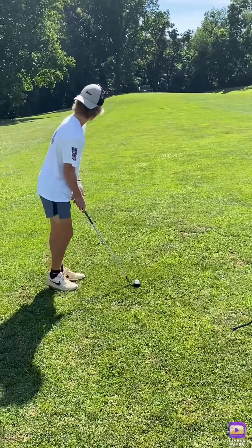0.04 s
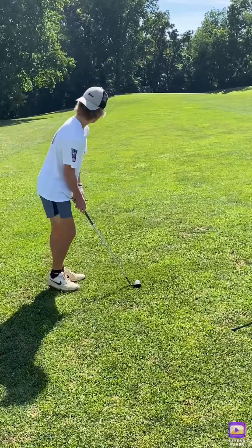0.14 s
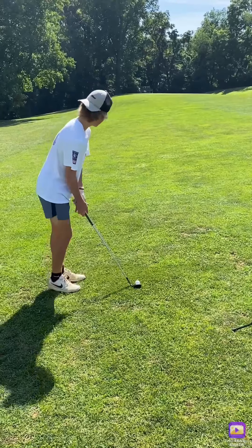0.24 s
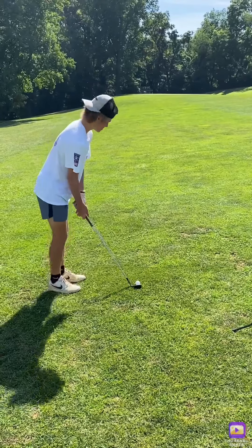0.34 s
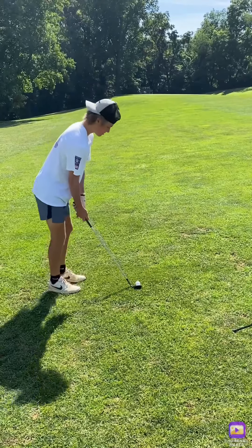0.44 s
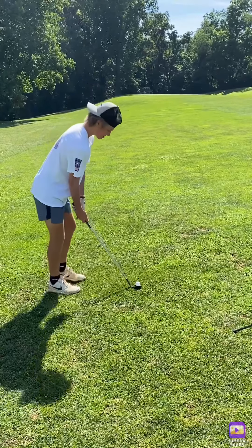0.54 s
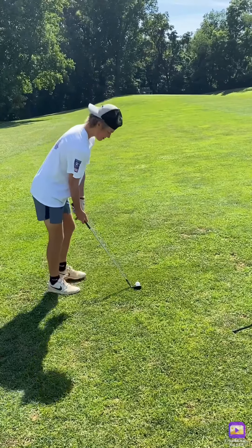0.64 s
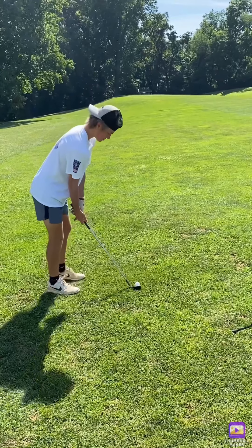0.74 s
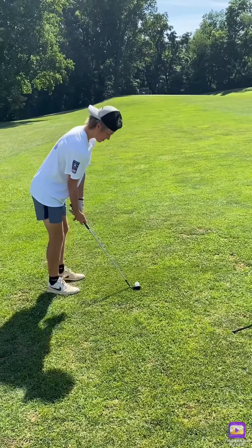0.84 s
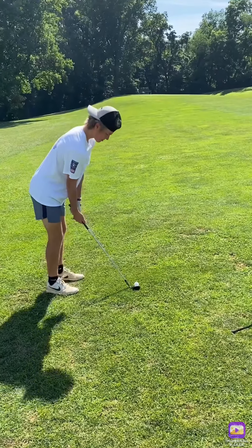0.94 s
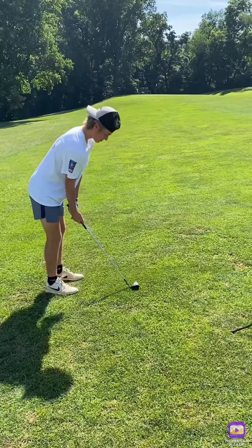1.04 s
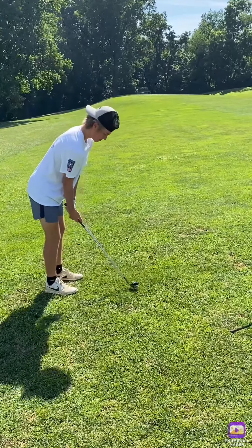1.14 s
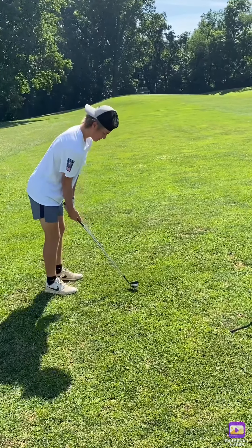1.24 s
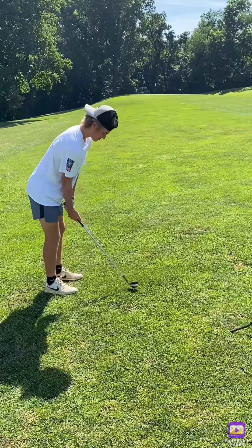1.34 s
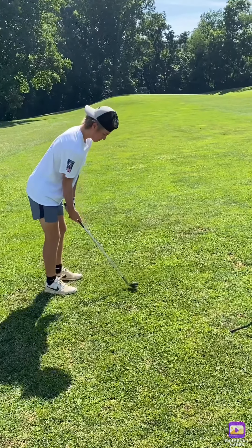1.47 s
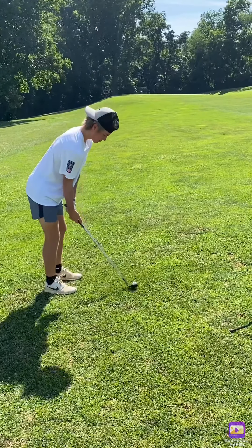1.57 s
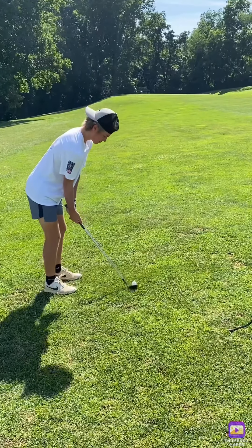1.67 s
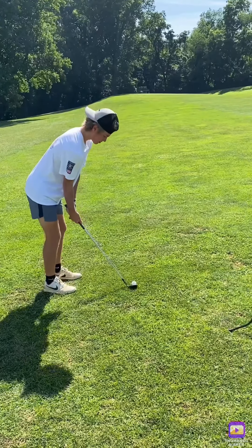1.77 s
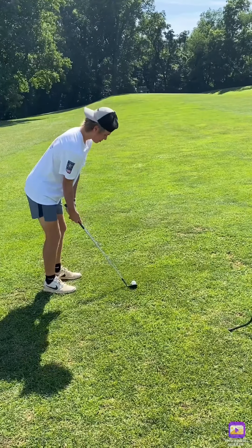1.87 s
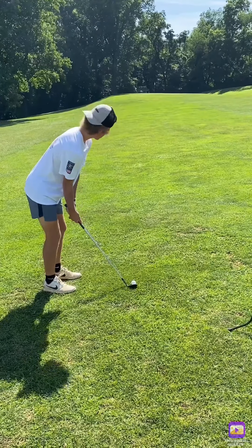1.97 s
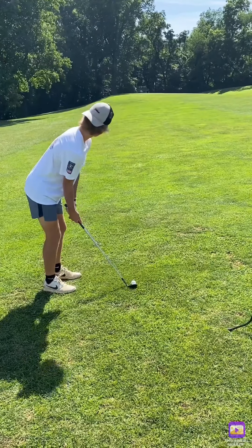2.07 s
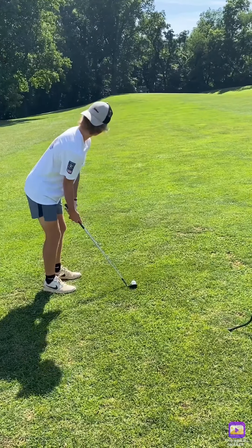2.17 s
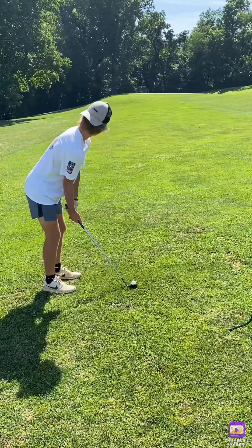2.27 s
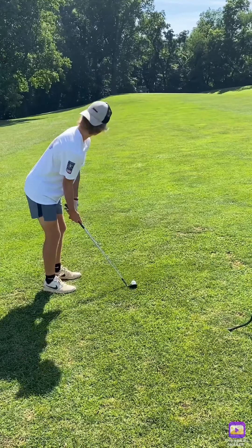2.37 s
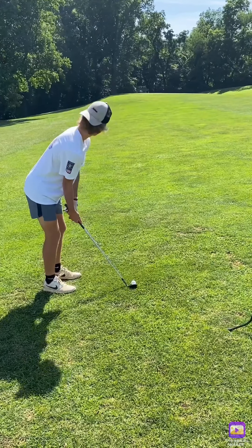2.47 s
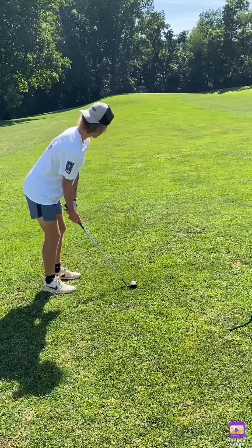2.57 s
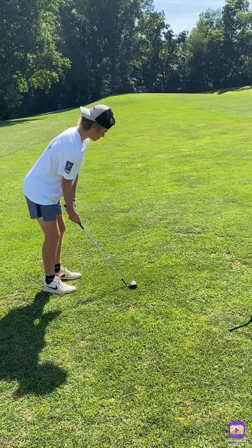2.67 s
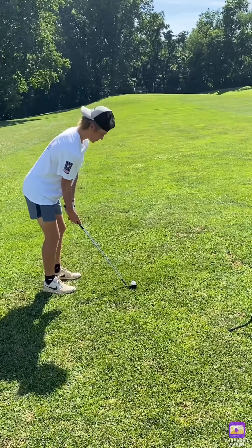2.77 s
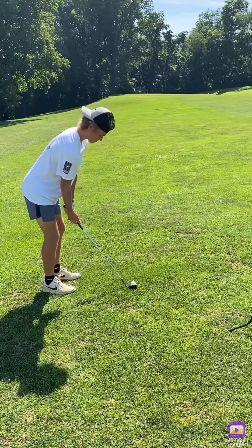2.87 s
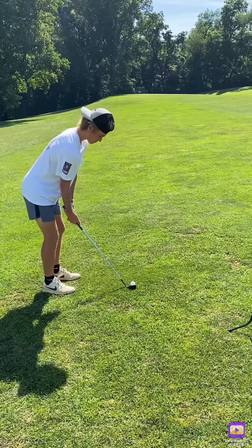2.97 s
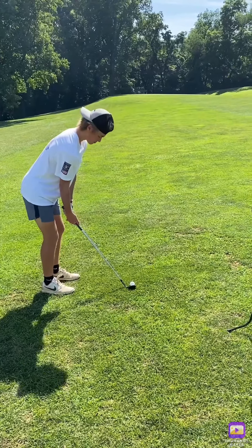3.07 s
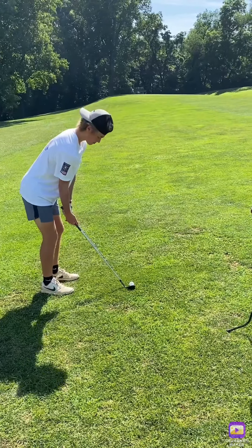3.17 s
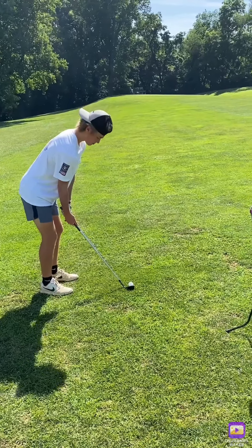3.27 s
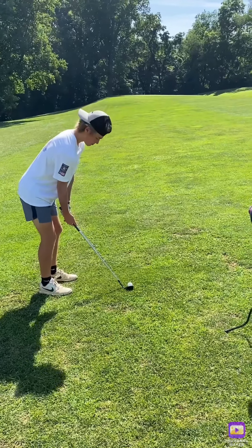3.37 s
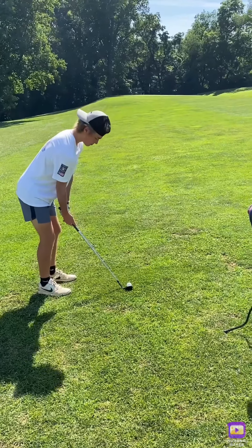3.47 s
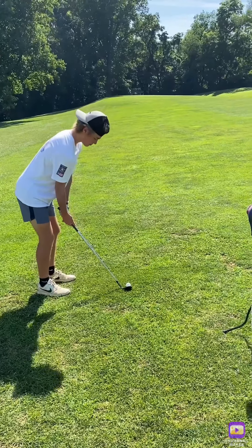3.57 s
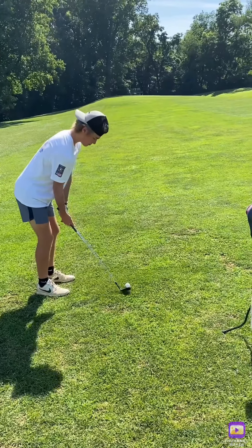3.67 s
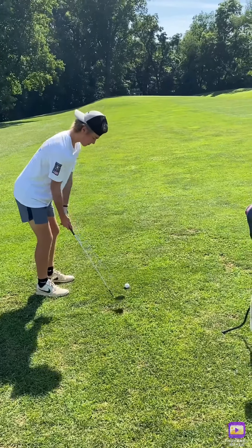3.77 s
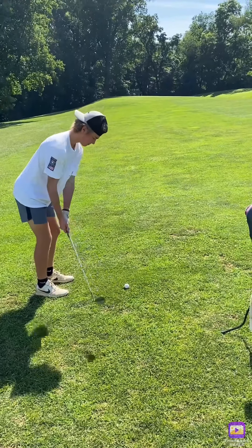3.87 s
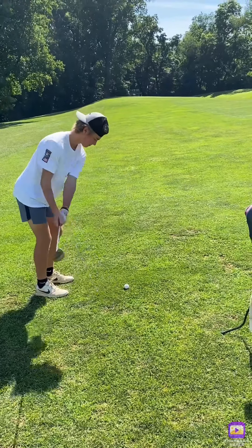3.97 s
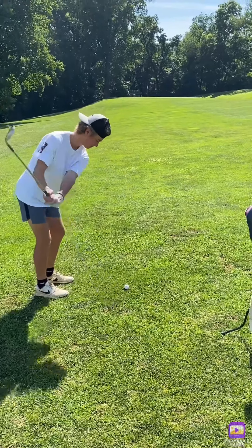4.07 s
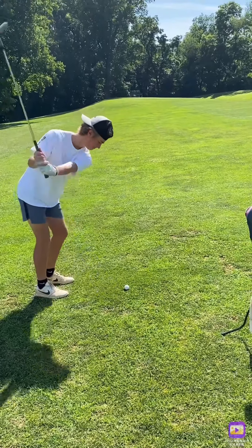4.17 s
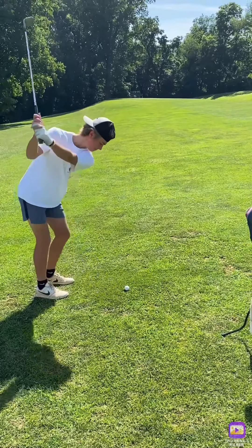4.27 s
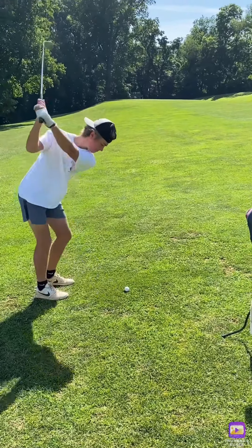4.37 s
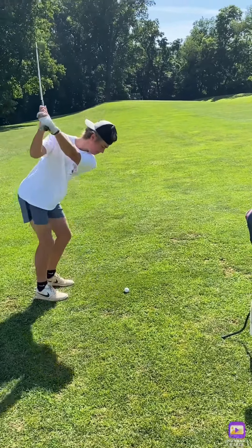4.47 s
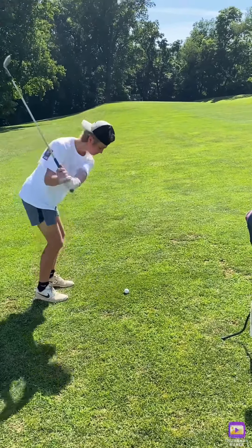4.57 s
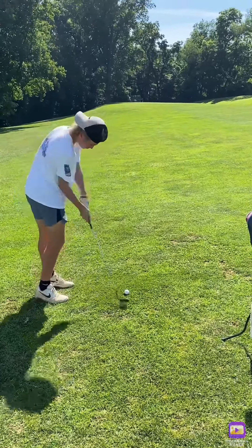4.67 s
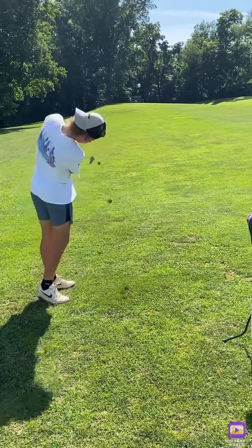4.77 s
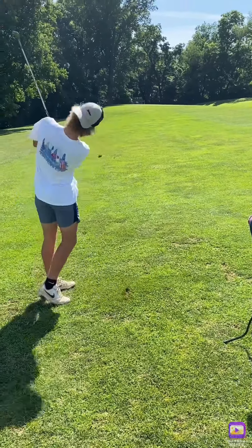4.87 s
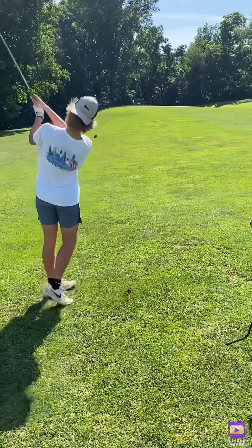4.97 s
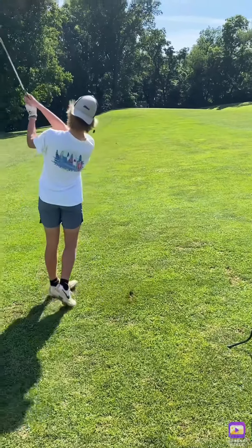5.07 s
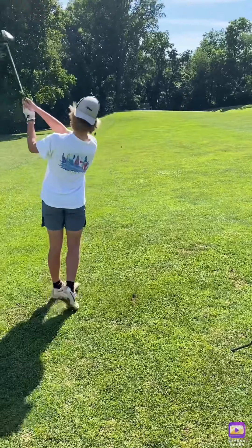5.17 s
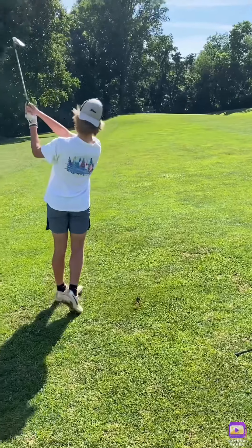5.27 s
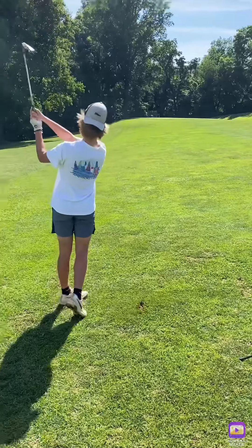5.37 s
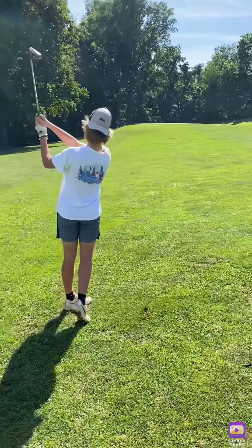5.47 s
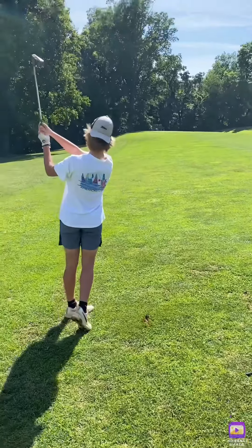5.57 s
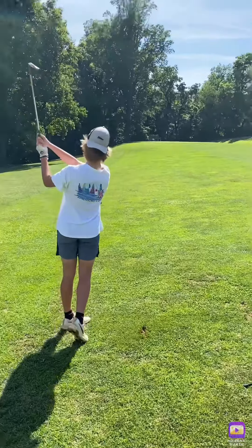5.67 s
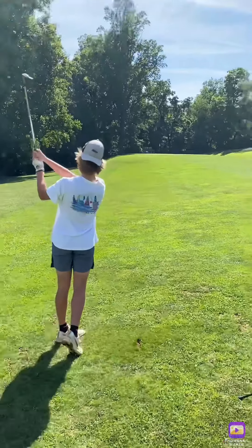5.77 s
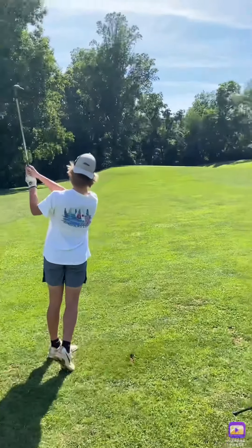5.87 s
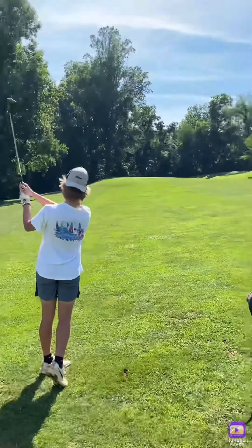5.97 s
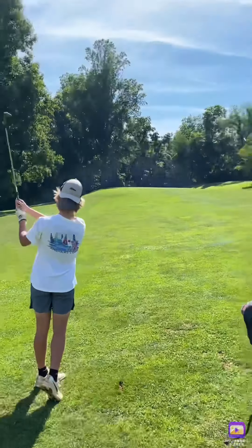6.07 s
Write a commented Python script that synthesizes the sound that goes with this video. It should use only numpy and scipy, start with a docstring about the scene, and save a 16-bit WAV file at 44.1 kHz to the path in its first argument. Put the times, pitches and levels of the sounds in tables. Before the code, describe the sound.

A soft outdoor bed lasts all six seconds: broad distant tyre rush, deep rumble, and two far mowers beating slightly right of centre, slowly fading. From 0 to 1.2 s, five faint dry knocks sound about a quarter second apart, with light grass rustling and a tiny stalk snap at 0.8. Thin high chirps come at 0.4, 0.9 and 2.2-2.35 s, echoing in trees among faint scattered whistles. A low exhaust note swells around 1.8, 2.25 and 3.9 s; a far machine's boom and whine ease after 3.2. Cloth rustles gently at 4.3, then a rapid swish rises to a single loud, dry, bright click at 4.71, with turf tearing and a short soil thud, gone within a tenth of a second. Follow-through rustle fades by 5.1. Three soft chirps follow at 5.25-5.4, leaves stir near 5.6, and a crisp grass scuff comes at 5.77.

```python
"""Golf iron shot on a fairway

An iron swishes down, strikes the ball with one sharp click (damped modes) and cuts a divot (noise bursts).
Behind it: traffic rush and breeze (shaped noise), two mowers and far machines (harmonics, wavering tones).
Clothes and grass rustle (flickering noise), birds chirp (gliding sines with echo), faint knocks sound far off.
Faint short whistling tones are scattered at random. Two close microphone ports pick it all up.
"""
import sys
import numpy as np
from scipy import signal
from scipy.fft import rfft, irfft, next_fast_len
from scipy.io import wavfile
from scipy.ndimage import map_coordinates

SR = 44100
rng = np.random.default_rng(int(sys.argv[2]) if len(sys.argv) > 2 else 0)


def master_out(mix):
    """Clip the mix to full scale and print it as 16-bit PCM to the path in sys.argv[1]."""
    frames = np.transpose(np.atleast_2d(mix))
    ceiling = np.clip(frames, -1, 1)
    pcm = np.round(ceiling * 32767).astype(np.int16)
    wavfile.write(sys.argv[1], SR, pcm)


N = 270485
T = np.arange(N) / SR


def amp(db):
    """Decibels to gain."""
    return 10 ** (np.asarray(db) / 20)


def unit(x):
    """Scale to rms 1."""
    return x / np.sqrt(np.mean(x ** 2) + 1e-20)


def wobble(rate_hz):
    """Smooth random curve, rate_hz knots a second."""
    knots = rng.standard_normal(int(N * rate_hz / SR) + 4)
    return map_coordinates(knots, [T * rate_hz])


def filtered(x, response):
    """Multiply the spectrum of x by a complex response of frequency."""
    size = next_fast_len(N + SR // 2)
    hz = np.fft.rfftfreq(size, 1 / SR)
    return irfft(rfft(x, size) * response(hz), size)[..., :N]


def coloured(x, spectrum):
    """Shape x by (frequency [Hz], gain [dB]) points on a log axis."""
    points_hz, points_db = np.transpose(spectrum)
    return filtered(x, lambda hz: amp(np.interp(np.log(hz + 1), np.log(points_hz), points_db)))


def noise(spectrum):
    """Coloured noise of rms 1; only the shape of the spectrum counts."""
    return unit(coloured(rng.standard_normal(N), spectrum))


def burst(peak_s, rise_s, t60_s):
    """Envelope climbing 60 dB in rise_s to its peak, then falling 60 dB in t60_s."""
    return amp(-60 * np.maximum((peak_s - T) / rise_s, (T - peak_s) / t60_s))


def ring(modes, start_s):
    """Exponentially damped modes set going together; neighbours start in opposite directions."""
    t = np.maximum(T - start_s, 0)
    total = np.zeros(N)
    for k, (hz, db, t60_s) in enumerate(modes):
        total += (-1) ** k * amp(db - 60 * t / t60_s) * np.sin(2 * np.pi * hz * t)
    return total


def swell(peak_s, width_s):
    """Gain rising to 1 at its peak and sinking again, 3 dB down width_s to either side."""
    return 1 / np.hypot(1, (T - peak_s) / width_s)


# tyre rush, rumble, tyre song: (frequency [Hz], relative density [dB/Hz])
TYRE_SPECTRUM = [(150, -0.5), (340, -9), (460, -3), (620, -4.5), (850, 0), (1300, -7), (1800, -10.5),
                 (2400, -14.5), (3500, -25), (4500, -33), (6600, -40), (8500, -69), (12500, -75),
                 (14500, -70.5)]
RUMBLE_SPECTRUM = [(22, -38.5), (32, -20), (43, -3), (70, 8.5), (110, -0.5), (160, -0.5), (220, -13.5),
                   (320, -19), (600, -82.5)]
TYRE_SONG_SPECTRUM = [(550, -26), (780, 4), (900, 9.5), (1050, -0.5), (1500, -12), (2500, -47.5)]
# tyre rush scattered by trees, relative to direct: (frequency [Hz], gain [dB])
TREE_SCATTER = [(300, -16.5), (500, -11.5), (1900, -14.5), (2400, -5), (6500, -15)]
# swells of the tyre song, one long and one brief: (peak time [s], level [dB], time to fall 3 dB [s])
TYRE_SONG_SWELLS = [(0.59, -50.5, 1.4), (3.0, -53.5, 0.3)]
TRAFFIC_START_DB, TRAFFIC_FADE_DB_PER_S = -44, .145


def traffic():
    """Far tyres rush, flutter and rumble, their song swells twice; a scattered part is opposite left and right."""
    level = amp(TRAFFIC_START_DB - TRAFFIC_FADE_DB_PER_S * T + .43 * wobble(3.5) + .59 * wobble(120))
    centre = level * noise(TYRE_SPECTRUM) + amp(-43.0) * noise(RUMBLE_SPECTRUM)
    song_power = sum((amp(db) * swell(s, width_s)) ** 2 for s, db, width_s in TYRE_SONG_SWELLS)
    flutter = amp(.8 * wobble(7) + 1.5 * wobble(120))
    centre += np.sqrt(song_power) * flutter * noise(TYRE_SONG_SPECTRUM)
    spread = level * coloured(noise(TYRE_SPECTRUM), TREE_SCATTER)
    spread += amp(-58.5) * noise(RUMBLE_SPECTRUM)
    return np.array([centre + spread, centre - spread])


def mower(cycle_hz, orders, drift, flutter_db):
    """Harmonics of one engine cycle; the speed hunts a little and the air makes each line flutter."""
    turns = np.cumsum(cycle_hz * (1 + drift * wobble(1.498))) / SR
    lines = np.zeros(N)
    for order, db in orders:
        phase_turns = round(order) * turns + rng.random()
        lines += amp(db + flutter_db * wobble(2.8)) * np.sin(2 * np.pi * phase_turns)
    return np.sqrt(2) * lines


def drone(hz, waver_db):
    """Far exhaust note wavering in level and phase."""
    return amp(waver_db * wobble(12)) * np.sin(2 * np.pi * (hz * T + .45 * wobble(7)))


# engine cycle rates: (mower A [Hz], mower B [Hz])
MOWER_CYCLE_HZ = (20.21, 21.27)
# mower harmonics: (multiple of cycle rate [1], relative level [dB])
MOWER_A_ORDERS = [(5, -45.5), (6, -62), (7, -46), (9, -46.5), (10, -52), (11, -54), (12, -54.5),
                  (14, -57.5), (16, -64), (19, -69.5), (21, -71), (23, -72.5)]
MOWER_B_ORDERS = [(2, -57), (5, -48.5), (6, -50.5), (7, -43), (8, -62), (9, -49), (10, -73), (12, -62),
                  (13, -62.5), (14, -63)]
MOWER_START_DB, MOWER_FADE_DB_PER_S = 1.03, .62  # added to the harmonics
# far machine's whine: (frequency [Hz], relative density [dB/Hz])
WHINE_SPECTRUM = [(300, 4), (385, 9), (430, 15.5), (480, 13.5), (560, 2.5), (750, -41.5)]
LOAD_MID_S, LOAD_RAMP_S = 3.2, .63
BOOM_HZ, BOOM_LOADED_DB, BOOM_GROWS_DB = 53.7, -39, 8
WHINE_LOADED_DB, WHINE_GROWS_DB = -55, 14.5
# far exhaust swelling and sinking: (time [s], level [dB])
EXHAUST_LEVEL = [(0, -40), (1.6, -41.5), (1.8, -29.5), (2.04, -42.5), (2.24, -29.5), (2.45, -42.5),
                 (2.9, -36), (3.6, -42.5), (3.86, -34), (4.1, -43.5), (5.3, -40), (6.1, -47.5)]
EXHAUST_HZ = 81.5


def engines():
    """Two receding mowers beat; a far machine booms and whines more as it takes up load; an exhaust drones."""
    mowers = mower(MOWER_CYCLE_HZ[0], MOWER_A_ORDERS, drift=.0015, flutter_db=1.0)
    mowers += mower(MOWER_CYCLE_HZ[1], MOWER_B_ORDERS, drift=.003, flutter_db=1.5)
    mowers *= amp(MOWER_START_DB - MOWER_FADE_DB_PER_S * T)
    slack = np.clip(.5 - (T - LOAD_MID_S) / LOAD_RAMP_S, 0, 1)  # 1 = unloaded
    boom = amp(BOOM_LOADED_DB - BOOM_GROWS_DB * slack) * drone(BOOM_HZ, waver_db=3.0)
    whine = amp(WHINE_LOADED_DB - WHINE_GROWS_DB * slack) * noise(WHINE_SPECTRUM)
    exhaust_gain = amp(np.interp(T, *np.transpose(EXHAUST_LEVEL)))
    return mowers + boom + whine + exhaust_gain * drone(EXHAUST_HZ, waver_db=2.0)


# leaves in a breeze: (frequency [Hz], relative density [dB/Hz])
LEAF_SPECTRUM = [(1500, -9.5), (3300, 4), (5500, -3.5), (6800, -12), (8500, -30)]
BREEZE_PEAK_S, BREEZE_DB, BREEZE_WIDTH_S = 5.6, -70, .49


def leaves():
    """A light breeze swells in the trees: wavering noise."""
    level = amp(BREEZE_DB + 1.5 * wobble(12))
    return level * swell(BREEZE_PEAK_S, BREEZE_WIDTH_S) * noise(LEAF_SPECTRUM)


# faint far knocks: (time [s], frequency [Hz], level [dB])
KNOCKS = [(0.089, 810, -32), (0.337, 1080, -32), (0.683, 950, -32), (0.93, 820, -32), (1.178, 860, -32.5)]


def knocks():
    """Faint, dry far knocks: sines a few cycles long."""
    total = np.zeros(N)
    for s, hz, db in KNOCKS:
        total += amp(db) * burst(s, rise_s=.005, t60_s=.018) * np.sin(2 * np.pi * hz * (T - s))
    return total


# chirps, and one faint steady echo note after the 2.33 s chirp:
# (time [s], length [s], starting pitch [Hz], fall as share of pitch [1], level [dB])
BIRD_NOTES = [(0.42, .02, 4570, .05, -65), (0.902, .04, 5500, .14, -65.5), (2.19, .032, 5570, .2, -69),
              (2.33, .032, 5090, .13, -63), (2.355, .05, 5050, 0, -72), (5.25, .06, 2600, -.04, -59),
              (5.315, .06, 2730, -.02, -58), (5.385, .08, 2890, -.12, -63)]
FLICKER_COUNT, FLICKER_MAX_DB = 26, -65
WOOD_DB, WOOD_T60_S = -4.5, .7


def whistles():
    """Bird chirps hold their pitch, then glide; faint short tones are scattered at random; the wood echoes."""
    flickers = []
    for a, b, c, d in rng.random((FLICKER_COUNT, 4)):
        # higher tones are fainter
        flickers.append((6.1 * a, .02 + .04 * b, 2600 + 2400 * c, .3 * d - .1, FLICKER_MAX_DB - 12 * c))
    notes = np.zeros(N + SR)
    for s, length_s, hz, fall, db in BIRD_NOTES + flickers:
        u = np.linspace(0, 1, int(length_s * SR))
        turns = np.cumsum(hz * (1 - fall * u ** 3)) / SR
        envelope = np.sin(np.pi * u ** 1.3) ** 2
        notes[int(s * SR):][:len(u)] += amp(db) * envelope * np.sin(2 * np.pi * turns)
    tail = rng.standard_normal(SR) * amp(-60 * T[:SR] / WOOD_T60_S)
    echo = signal.fftconvolve(notes, tail / np.linalg.norm(tail))[:N]
    return notes[:N] + amp(WOOD_DB) * echo


# crushed grass, dry stalk: (frequency [Hz], relative density [dB/Hz])
GRASS_SPECTRUM = [(1000, -7.5), (3000, 5.5), (5500, 7), (7000, -2), (8500, -6), (10700, -3), (12500, -8),
                  (15500, -8)]
STALK_SPECTRUM = [(1000, -9), (5000, 5), (11000, -4), (15500, -7)]
# shoes shifting, and a brief loud crackly rustle at 5.76 s: (time [s], length [s], level [dB])
SCUFFS = [(0.04, 0.11, -75), (0.198, .06, -71), (0.42, .2, -78), (5.395, .03, -75), (5.54, .03, -74),
          (5.763, 0.03, -55.5), (5.787, .035, -58.5)]
SCUFF_EASE = 5.7  # 60 dB decay time in scuff lengths
# snapping stalks: (time [s], relative level [dB])
SNAPS = [(0.8012, -54.5), (4.903, -52), (5.108, -59), (5.397, -66)]


def footwork():
    """Grass crushes in clumps of tiny crackles that ease as the blades give, mostly under shoes; single stalks
    snap."""
    pressure = np.zeros(N)
    for s, length_s, db in SCUFFS:
        press = burst(s, rise_s=.014, t60_s=SCUFF_EASE * length_s)
        release = burst(s + length_s, rise_s=20, t60_s=.17)
        pressure += amp(db) * press * release
    crackle = unit(amp(2.5 * wobble(170) + 3.5 * wobble(1100)) * noise(GRASS_SPECTRUM))
    snaps = sum(amp(db - 2) * burst(s, rise_s=.003, t60_s=.009) for s, db in SNAPS)
    return pressure * crackle + snaps * noise(STALK_SPECTRUM)


# air and cloth: (frequency [Hz], relative density [dB/Hz])
SWISH_SPECTRUM = [(300, -20.5), (1000, 7), (3000, 4), (6000, -6), (9000, -5.5), (12000, -9.5),
                  (15500, -15.5)]
# backswing to follow-through: (fastest moment [s], level [dB], 60 dB rise [s], 60 dB fall [s])
STROKES = [(4.29, -66, 1, 1.5), (4.59, -63.5, .5, 0.2), (4.688, -50.5, 0.06, 0.34), (4.745, -54, .5, 0.36),
           (4.785, -55, .5, 0.4), (4.95, -61.5, .9, 0.4), (5.08, -67.5, 1, 0.8)]


def swing():
    """Strokes swell and die: cloth rustles back and through, the shaft cuts the air fastest near the ball."""
    power = sum((amp(db) * burst(s, rise_s, fall_s)) ** 2 for s, db, rise_s, fall_s in STROKES)
    folds = amp(.5 * wobble(60) + 1.2 * wobble(600))
    return np.sqrt(power) * folds * noise(SWISH_SPECTRUM)


IMPACT_S = 4.71227
# scraped soil and roots: (frequency [Hz], relative density [dB/Hz])
DIVOT_SPECTRUM = [(120, 4), (400, 6), (1000, -1), (2100, 4), (3300, 0), (4000, -8), (5500, -4), (8000, -6),
                  (10500, -5), (15500, -7), (18000, -35)]
DIG_IN_S, DIG_OUT_S, DIVOT_DB = .002, .007, -26.6  # in before impact, out after


def divot():
    """The blade scrapes through soil and roots for as long as it is in the ground."""
    entry = burst(IMPACT_S - DIG_IN_S, rise_s=.012, t60_s=20)
    leaving = burst(IMPACT_S + DIG_OUT_S, rise_s=20, t60_s=.008)
    return amp(DIVOT_DB) * entry * leaving * noise(DIVOT_SPECTRUM)


# tearing grass: (frequency [Hz], relative density [dB/Hz])
TURF_SPECTRUM = [(150, -6), (500, -3), (1500, 0), (3200, 2), (4100, -7), (5700, 0), (8000, -2), (10000, 2),
                 (12000, 0), (15500, 0), (18000, -30)]
# club head and ball, damped contact crack, soil: (frequency [Hz], level [dB], t60 [s])
CLUB_MODES = [(1590, -10.8, .0141), (2080, -22.4, .0157), (2310, -9.9, .0143), (2600, -22, .0233),
              (2970, -20.5, .023), (3340, -12.8, .0106), (4940, -19.7, .0193), (5650, -17.4, .0115),
              (6270, -16.1, .0114), (6680, -22.8, .0143), (7300, -16.8, .0095), (9830, -15.4, .0079),
              (10480, -26.1, .008)]
CRACK_MODES = [(1860, .5, .0017), (2220, -2.8, .0072), (5850, -19.8, .0019), (9950, -11.6, .002)]
SOIL_MODES = [(160, -24.7, .063), (250, -21.7, .052), (405, -20.8, .055), (570, -19.9, .031),
              (730, -13, .0133), (1160, -29.5, .052)]


def strike():
    """The blade tears the grass, cracks against the ball, rings briefly and thumps the soil just after."""
    turf = amp(-17) * burst(IMPACT_S, rise_s=.014, t60_s=.02) * noise(TURF_SPECTRUM)
    click = ring(CLUB_MODES, IMPACT_S)
    crack = ring(CRACK_MODES, IMPACT_S + .000375)
    thud = ring(SOIL_MODES, IMPACT_S + .00091)
    return turf + click + crack + thud


def scene():
    """Traffic has width, engines sit slightly right, the rest lies straight ahead."""
    background = traffic() + engines() * amp([[-.3], [.3]]) + leaves() + knocks() + whistles()
    return background + footwork() + swing() + divot() + strike()


# left port over right: (frequency [Hz], level [dB])
PORT_BALANCE = [(100, 0), (300, -.5), (750, 1.2), (1150, 2), (1650, 0), (2400, -3.8), (3200, 2),
                (3800, -.3), (5000, .2)]
# left port's lead over right: (frequency [Hz], phase [rad])
PORT_PHASE = [(0, 0), (2000, 0), (2400, .6), (2780, 2), (3600, .6), (4200, .8), (4900, .4), (5500, .8),
              (6400, 2.1), (7300, 3.14), (8200, 3.8), (9800, 6.1), (11800, 7.2), (13500, 9.4),
              (15500, 11.6)]
LOW_CUT_HZ, TOP_HZ = 33, 15700


def record(dry):
    """Ports differ in level and phase by frequency; deep bass and top treble are cut, peaks rounded."""
    def log_ratio(hz):
        """Complex log of left over right."""
        level = np.log(amp(np.interp(hz, *np.transpose(PORT_BALANCE))))
        return level + 1j * np.interp(hz, *np.transpose(PORT_PHASE))

    # each port takes half the difference
    pair = filtered(dry, lambda hz: np.exp(np.array([log_ratio(hz), -log_ratio(hz)]) / 2))
    pair = signal.sosfilt(signal.butter(4, LOW_CUT_HZ, "high", fs=SR, output="sos"), pair)
    rounded = pair / (1 + (pair / .8) ** 6) ** (1 / 6)
    return filtered(rounded, lambda hz: 1 / np.sqrt(1 + (hz / TOP_HZ) ** 200))


dry = scene()
out = record(dry)
master_out(out)
```